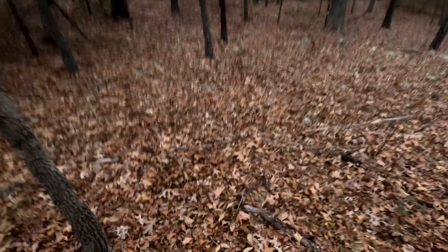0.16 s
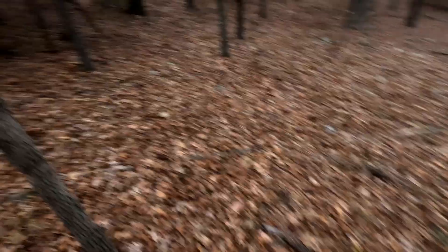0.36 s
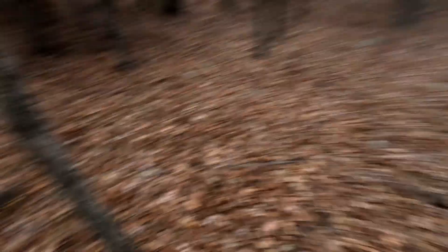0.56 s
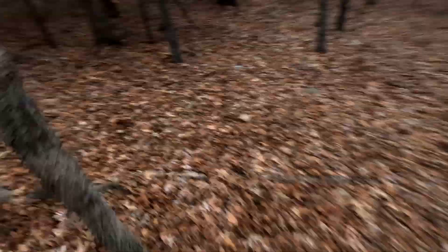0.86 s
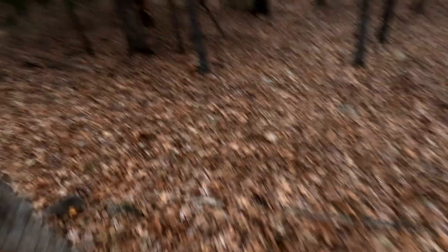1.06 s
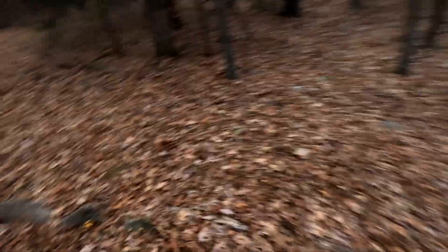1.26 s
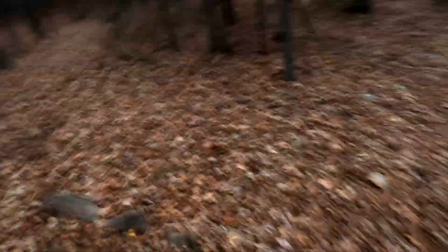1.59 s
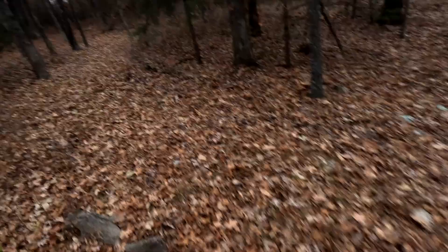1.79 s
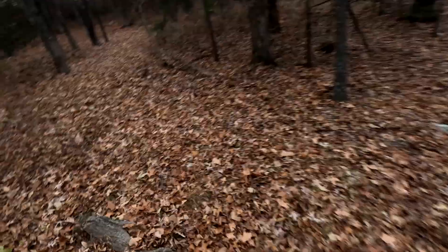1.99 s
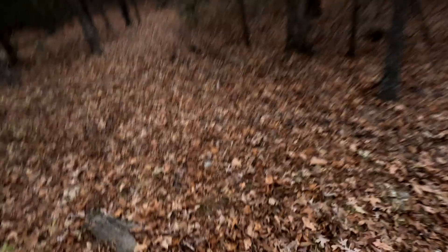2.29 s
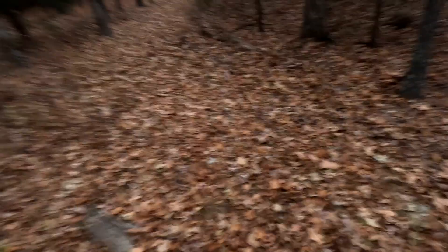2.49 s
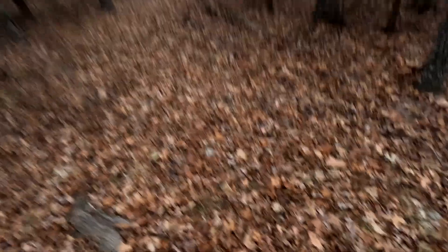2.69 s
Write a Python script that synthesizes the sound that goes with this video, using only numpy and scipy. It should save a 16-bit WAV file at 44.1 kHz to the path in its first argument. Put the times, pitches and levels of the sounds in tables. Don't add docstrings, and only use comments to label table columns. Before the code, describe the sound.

Footsteps crush dry leaves in a quiet wood, three heavy bursts of crackle with small snaps between, heard from a body-worn cased microphone with low thuds, case knocks and strap rubbing.

```python
import sys
import numpy as np
from scipy import signal
from scipy.fft import rfft, irfft
from scipy.io import wavfile

SR = 44100
rng = np.random.default_rng(int(sys.argv[2]) if len(sys.argv) > 2 else 0)


def nominal_scale(level):
    x = np.asarray(level, float) / 20
    return 10 ** x


def transcribe(u):
    v = np.clip(np.atleast_2d(u).T, -1, 1)
    q = np.round(v * 32767).astype(np.int16)
    wavfile.write(sys.argv[1], SR, q)


N = 125685
TIME = np.arange(N) / SR
LEFT_RIGHT = np.array([[1], [-1]])


def rms_one(x):
    return x / np.sqrt(np.mean(x ** 2) + 1e-20)


def cut(x, hz, kind, order=1):
    return signal.sosfilt(signal.butter(order, hz, kind, fs=SR, output="sos"), x)


def around(x, hz, share):
    return cut(x, [hz * (1 - share), hz * (1 + share)], "band", order=2)


def drift(rate_hz):
    r = np.exp(-2 * np.pi * rate_hz / SR)
    settling = 9000
    noise = rng.standard_normal(N + settling)
    return rms_one(signal.lfilter([1], [1, -2 * r, r * r], noise)[settling:])


def swells(rows):
    power = 0
    for start, rise, hold, fall, db in rows:
        up = np.clip((TIME - start) / max(rise, 1e-3), 0, 1)
        dying = np.maximum(TIME - start - rise - hold, 0)
        power = power + (up ** 2 * nominal_scale(db - fall * dying)) ** 2
    return np.sqrt(power)


def crackle(per_s, spread_db, clump_db):
    sizes = nominal_scale(spread_db * np.minimum(rng.exponential(1, N), 5)) * rng.choice([-1, 1], N)
    born = rng.random(N) < per_s / SR
    clumps = nominal_scale(clump_db * (drift(130) + 0.77 * drift(35)))
    return rms_one(sizes * born * clumps)


def ring(clicks, hz, t60):
    r, w = nominal_scale(-60 / (t60 * SR)), 2 * np.pi * hz / SR
    return signal.lfilter([0, np.sin(w)], [1, -2 * r * np.cos(w), r * r], clicks + 1e-18)


def through_case(x):
    # (pitch [Hz], width [Hz], level [dB], left minus right [dB], side path [dB])
    resonances = [(240, 41.6, 0, -2.5, -10), (641, 117, -4.5, 0, -6.5), (961, 90, 1, 0, -11),
                  (1112, 182, 0.0, -3, -10), (1357, 304, -0.5, 2, -21.5), (1781, 168, 1, 4, -6.5),
                  (2464, 316, -5, 9.5, -1.5), (2954, 310, -0.5, 4, -7), (3824, 320, -1.5, 0.5, -6),
                  (4620, 640, -4, -2.9, -10.5), (5295, 538, -1.5, -3, -14.5), (6796, 760, -6, -0.5, -14),
                  (9210, 1240, -19, 2, -12.5), (10460, 740, -19.5, 3, -7)]
    side_path_s, patchy_db = .006, 1.2
    taps = np.arange(1200)
    path = rng.standard_normal(1200) * np.exp(-taps / SR / side_path_s)
    path = path / np.linalg.norm(path)
    detour = np.convolve(x, path)[:N] + 0.5 * x * rng.choice([-1, 1], N)
    both = np.array([x, detour]) + 1e-18
    out = 0
    for k, (hz, width, db, left_db, side_db) in enumerate(resonances):
        r = np.exp(-np.pi * width / SR)
        poles = [1, -2 * r * np.cos(2 * np.pi * hz / SR), r * r]
        mid, side = signal.lfilter([(1 - r * r) / 2, 0, (r * r - 1) / 2], poles, both)
        gain = nominal_scale(db + patchy_db * drift(37) + left_db * LEFT_RIGHT / 2)
        out = out + (-1) ** k * gain * (mid + nominal_scale(side_db) * side * LEFT_RIGHT)
    return out


def faint_hiss():
    return nominal_scale(-65.5) * rng.standard_normal(N)


def rustle():
    level = nominal_scale(-68 + drift(23) + drift(97))
    return nominal_scale(13.5) * cut(level * rng.standard_normal(N), 2670, "low", order=2)


def wobbles():
    # (middle [s], length [s], pitch [Hz], minus for a trough in the middle, peak [dB])
    swings = [(.227, .11, -24, -10), (.125, .07, -22, -21), (.332, .04, 35, -21), (1.045, .14, -23, -11),
              (1.1345, .13, -22.5, -10), (1.2275, .12, -23, -21), (1.401, .12, -29, -14),
              (1.47, .05, 14, -12), (1.505, .04, -14, -15), (1.594, .06, 30, -16), (1.66, .05, 16, -14),
              (1.715, .08, -8, -15), (1.785, .05, 14, -21), (1.275, .04, -20, -23), (.309, .02, -40, -21),
              (.385, .08, 11, -21), (2.125, .12, -28, -25), (2.355, .1, -21, -10), (2.635, .5, 11.7, -19)]
    out = 0
    for s, length, hz, db in swings:
        hump = np.cos(np.pi * np.clip((TIME - s) / (1.3 * length), -.5, .5)) ** 2
        out = out + np.sign(hz) * nominal_scale(db) * np.cos(2 * np.pi * hz * (TIME - s)) * hump
    return out


def rumble():
    # (pitch [Hz], level [dB per Hz])
    spectrum = [(20, -24), (35, 4.5), (50, -0.5), (80, -16), (130, -30), (300, -38.5)]
    # (time [s], level [dB])
    shaking = [(0.1, -45), (0.23, -31), (0.28, -40), (0.31, -30.5), (0.41, -49.5), (0.82, -51),
               (1.04, -30.5), (1.28, -38.5), (1.47, -30.5), (1.79, -37), (1.85, -54.5), (1.93, -58),
               (2.03, -67), (2.11, -45), (2.19, -46), (2.25, -46), (2.31, -33), (2.6, -42.5)]
    rumble_db, follows = -8, 1.4
    hz = np.maximum(np.arange(N // 2 + 1) * SR / N, 1)
    corner_hz, corner_db = np.transpose(spectrum)
    shape = nominal_scale(np.interp(np.log(hz), np.log(corner_hz), corner_db, right=-120))
    mid, side = irfft(rfft(rng.standard_normal((2, N))) * shape, N)
    shaking_db = np.interp(TIME, *np.transpose(shaking)) + 40.5
    level = nominal_scale(rumble_db + follows * shaking_db - 36 + 3.3 * drift(11.7)) / np.std(mid)
    return level * (mid + nominal_scale(-24.0) * side * LEFT_RIGHT)


def mount():
    deep = cut(rng.standard_normal(N + SR), 22, "low", order=3)
    deep = nominal_scale(-36) * rms_one(cut(deep, 5.6, "high")[SR:])
    left_db = -2
    return nominal_scale(left_db * LEFT_RIGHT / 2) * (wobbles() + deep + rumble())


def thuds():
    # (time [s], peak [dB], pitch [Hz])
    bumps = [(0.201, -36, 111), (.3, -25.5, 98), (0.504, -41, 118), (1.005, -25, 114), (1.11, -26, 159),
             (1.282, -31, 146), (1.439, -23.5, 166), (1.489, -26.5, 179), (1.579, -44.5, 88.5),
             (1.629, -34.5, 159), (1.701, -37.5, 198), (1.746, -32, 145), (1.85, -47.5, 196),
             (1.92, -40.5, 198), (2.31, -25.5, 99), (2.371, -32, 235), (2.515, -44, 153), (2.048, -45, 231),
             (2.562, -45, 226), (2.638, -45, 229)]
    rise_s, fall_s = 0.0083, 0.0075
    out, t = np.zeros((2, N)), np.arange(8000) / SR
    rise = np.sin(np.minimum(t / rise_s, 1) * np.pi / 2) ** 2
    shape = rise * np.exp(-np.maximum(t - rise_s, 0) / fall_s)
    for (s, db, hz), (turn, lean) in zip(bumps, rng.uniform(-1.33, 1, (len(bumps), 2))):
        phase = 2 * np.pi * hz * t * (1 - 2.03 * t) + np.pi * turn + 0.17 * lean * LEFT_RIGHT
        i = int(s * SR)
        out[:, i:i + 8000] += nominal_scale(db - 8.5) * shape * np.sin(phase)
    return out


def knocks():
    # (time [s], peak [dB], main ring [Hz], second ring [Hz])
    blows = [(0.3074, -36.5, 1470, 582), (.311, -42.5, 1014, 650), (0.509, -57, 225, 705),
             (1.046, -67, 323, 656), (1.114, -41, 1400, 359), (1.2866, -32.5, 3580, 3330),
             (1.288, -36, 1767, 1160), (1.4431, -28, 685, 960), (1.4462, -24.5, 1740, 1300),
             (1.4467, -26.5, 3800, 3140), (1.924, -44, 240, 646), (2.368, -41, 890, 1370),
             (2.525, -42.5, 1040, 1350), (2.538, -44.5, 2700, 1340)]
    contact_s, tap_s, ring_cycles = .0012, .00004, 15
    second_ring_db, case_share_db = 7, 14.5
    out, contacts, t = np.zeros((2, N)), np.zeros(N), np.arange(4000) / SR
    pulse = np.exp(-(t / tap_s - 2) ** 2 / 2) / (2.26 * tap_s * SR)
    grits = rng.standard_normal((len(blows), 4000))
    for (s, db, main_hz, second_hz), grit in zip(blows, grits):
        i = int(s * SR)
        hit = grit * t * np.exp(-t / contact_s)
        hit = nominal_scale(db + 12.5) * hit / np.linalg.norm(hit)
        contacts[i:i + 4000] += around(hit, main_hz, .09) + around(hit, second_hz, .09)
        band = [0.72 * min(main_hz, second_hz), 0.94 * max(main_hz, second_hz)]
        tap = nominal_scale(db - 3.0) * cut(pulse, band, "band", order=2)
        main = ring(tap, main_hz, ring_cycles / main_hz)
        second = ring(tap, second_hz, ring_cycles / second_hz)
        out[:, i:i + 4000] += nominal_scale(1.4 * LEFT_RIGHT) * (main + nominal_scale(second_ring_db) * second)
    return out + nominal_scale(case_share_db) * through_case(contacts)


def rubbing():
    # (start [s], rise [s], hold [s], fall [dB per s], level [dB])
    rubs = [(.12, 0.085, 0.09, 284, -58.5), (.5, 0.034, 0.055, 88, -68.5), (.99, 0.016, 0.062, 283, -51.5),
            (1.095, 0.01, 0.002, 400, -40), (1.14, 0.0066, .005, 296, -54), (1.35, 0.04, 0.012, 300, -49.5),
            (1.425, 0.011, 0.011, 396, -40), (1.468, 0.012, 0.035, 486, -34),
            (1.55, 0.033, 0.087, 306, -55), (1.61, 0.0097, 0.032, 602, -45.5),
            (1.67, 0.022, 0.021, 591, -43), (1.742, 0.0081, 0.029, 388, -49.5),
            (1.86, 0.007, 0.24, 108, -59), (2.22, 0.025, 0.17, 94, -59), (2.352, 0.01, 0.0034, 500, -43.5),
            (2.49, 0.013, 0.033, 185, -53.5), (2.63, 0.0039, 0.0075, 213, -59)]
    x = swells(rubs) * crackle(per_s=6000, spread_db=1.5, clump_db=1.1)
    return nominal_scale(17.5) * cut(cut(x, 1120, "low", order=2), 246, "high")


def snaps():
    # (time [s], level [dB],
    # pitch [Hz], length [s])
    cracks = [(0.072, -64, 6880, .01), (.1007, -38.5, 6600, .005), (1.918, -68, 2920, 0.064),
              (0.131, -39.5, 6700, .008), (0.143, -39.5, 4600, .025), (2.1121, -41.5, 10600, .002),
              (0.258, -44.5, 4600, .035), (1.448, -37, 5450, .002), (0.321, -41, 6700, .015),
              (0.3523, -39.5, 6800, .003), (0.3532, -43, 4900, .003), (0.391, -41, 6600, .002),
              (.396, -46, 5500, .002), (0.416, -51, 6000, .0015), (0.464, -46, 4400, .003),
              (0.475, -45.5, 6600, .002), (0.506, -53, 6900, .002), (0.523, -46, 6870, .002),
              (0.56, -65, 6430, .002), (0.606, -59, 3780, .002), (0.659, -58.5, 1120, .01),
              (1.371, -20, 12400, 0.0024), (0.746, -54, 3700, .002), (.8345, -53, 5380, .004),
              (0.9594, -46, 1880, .01), (0.9636, -43.5, 3700, .004), (.964, -39.5, 6500, .004),
              (1.114, -35.5, 5300, 0.009), (1.352, -52, 3900, .005), (1.3533, -41, 6400, .008),
              (1.3726, -30.5, 6730, .006), (1.391, -40, 6600, .005), (1.487, -40.5, 2900, .01),
              (1.7424, -47, 7000, .003), (2.04, -58.5, 3160, 0.088), (2.026, -53, 6400, .003),
              (2.111, -48, 4500, .003), (2.1116, -42.5, 7200, .003), (2.1999, -76, 7000, .002),
              (2.2478, -41.5, 3900, .004), (2.306, -37.5, 6000, .006), (2.336, -30.5, 8600, .005),
              (2.411, -43.5, 4000, .002), (2.4605, -35.5, 9000, .002), (2.456, -41, 5600, .002),
              (2.563, -49.5, 3800, .004), (2.66, -53, 3600, .003), (2.669, -50, 6000, .002),
              (2.7182, -59, 6100, .002), (2.7492, -54.5, 4470, .002)]
    out, t = np.zeros(N + 9000), np.arange(9000) / SR
    grits = rng.standard_normal((len(cracks), 9000))
    for (s, db, hz, length), grit in zip(cracks, grits):
        rise = .7 * length
        shape = np.minimum(t / rise, 1) * np.exp(-(np.maximum(t - rise, 0) / length) ** 2)
        burst = around(shape * grit, hz, .12)
        i = int((s - rise / 2) * SR)
        out[i:i + 9000] += nominal_scale(db) * burst * np.linalg.norm(shape) / np.linalg.norm(burst)
    return out[:N]


def leaves():
    # (start [s], rise [s], hold [s], fall [dB per s], level [dB])
    crushes = [(.04, 0.031, 0.045, 47, -51), (.11, 0.023, 0.19, 368, -44), (.36, 0.0068, 0.042, 10, -61),
               (.827, 0.0062, 0.054, 153, -53), (.92, 0.017, 0.089, 164, -48),
               (1.0, 0.073, 0.044, 109, -44.5), (1.24, 0.047, 0.11, 35, -55),
               (1.33, 0.037, 0.0065, 429, -39.5), (1.47, 0.076, 0.016, 296, -39.5),
               (1.6, 0.015, 0.052, 107, -51.5), (2.05, 0.21, 0.14, 113, -47.5),
               (2.23, 0.094, 0.0098, 171, -40), (2.5, 0.025, 0.018, 42, -60.5)]
    # (time [s], level [dB])
    brittle_rows = [
        (0, 8),
        (.6, -1.5),
        (.85, -31),
        (1.3, 1.5),
        (1.7, -14),
        (2.2, -6),
    ]
    # (low edge, high edge) [Hz]
    brittle_hz = [6650, 6890]
    x = swells(crushes) * crackle(per_s=8500, spread_db=2.7, clump_db=1.0)
    brittle = nominal_scale(np.interp(TIME, *np.transpose(brittle_rows))) * cut(x, brittle_hz, "band")
    bright = cut(x, 4030, "high", order=2)
    body = nominal_scale(-1) * cut(x, [1150, 1900], "band", order=2)
    return nominal_scale(8.0) * (brittle + bright + body) + snaps()


def scene():
    heard_through = faint_hiss() + rustle() + rubbing() + leaves()
    return mount() + thuds() + knocks() + through_case(heard_through)


def roll_off(x):
    return signal.sosfilt(signal.butter(12, 14960, fs=SR, output="sos"), x)


def record(dry):
    step_hz = 10280
    main = cut(dry, step_hz, "low", order=8)
    air = nominal_scale(-2.5) * cut(cut(dry, step_hz, "high", order=4), 13950, "low", order=4)
    return roll_off(main + air - .002)


dry = scene()
out = record(dry)
transcribe(out)
```